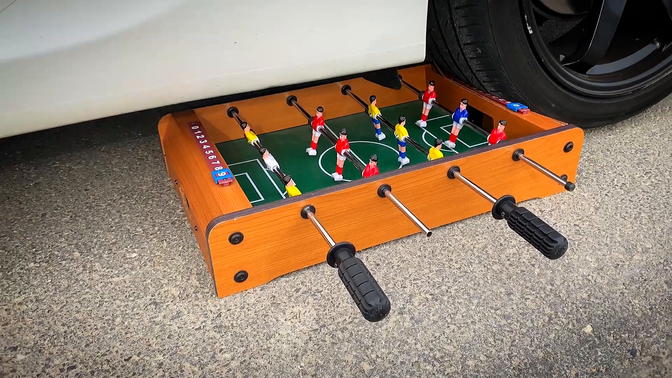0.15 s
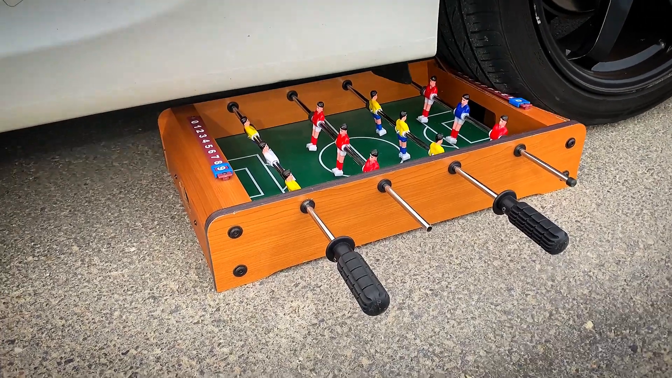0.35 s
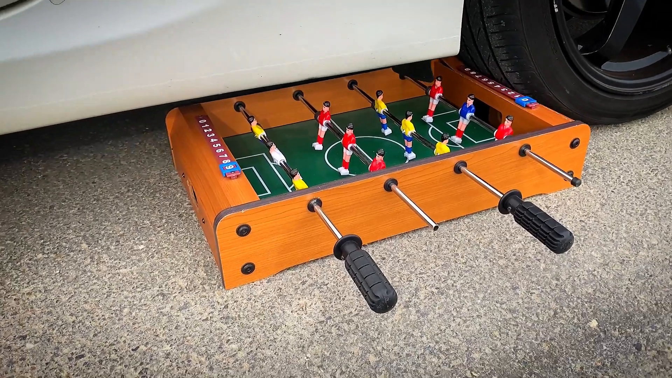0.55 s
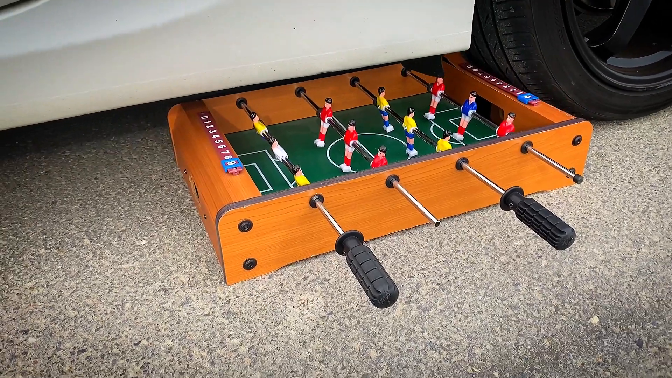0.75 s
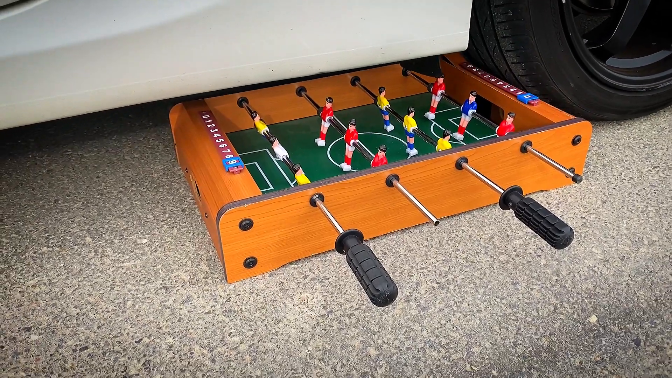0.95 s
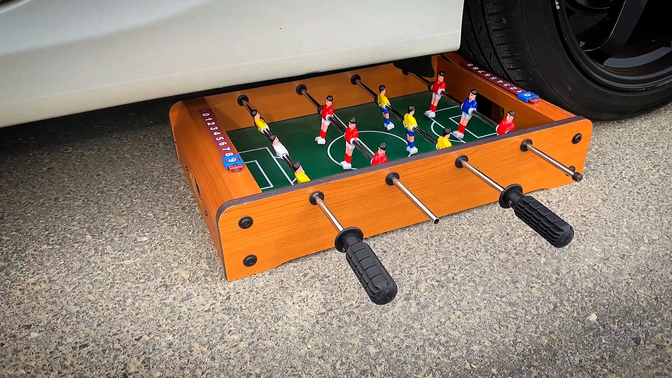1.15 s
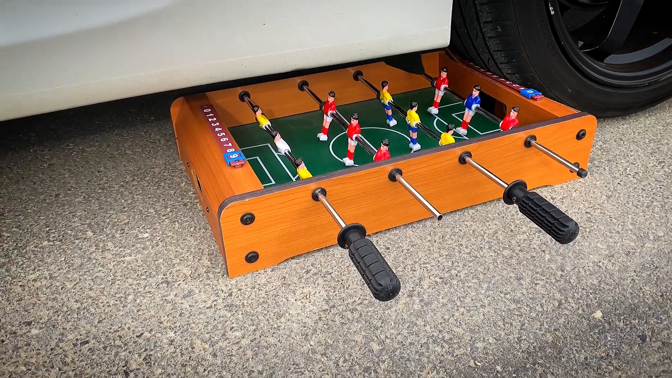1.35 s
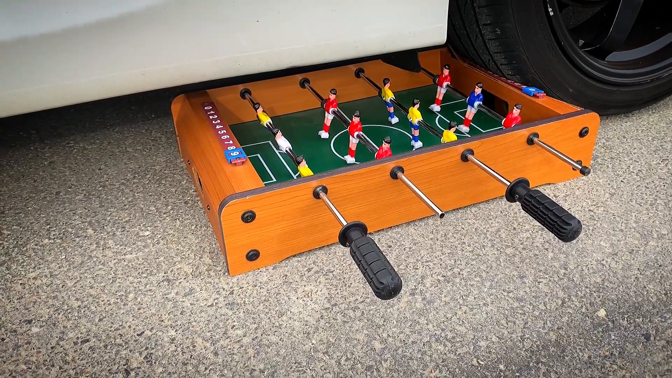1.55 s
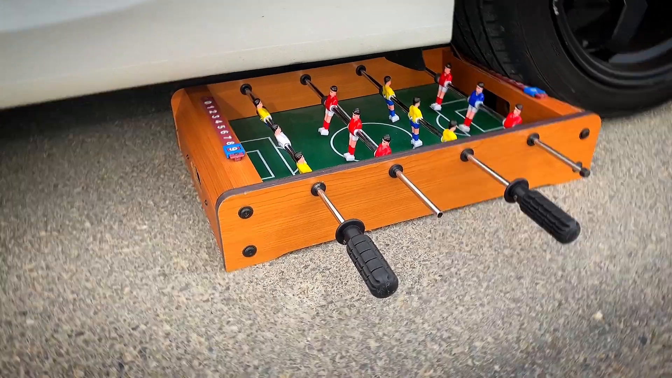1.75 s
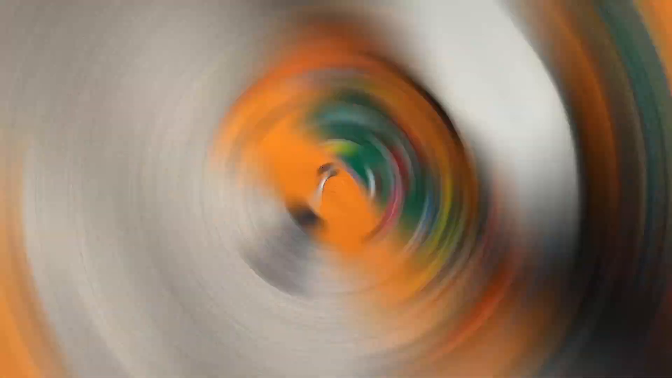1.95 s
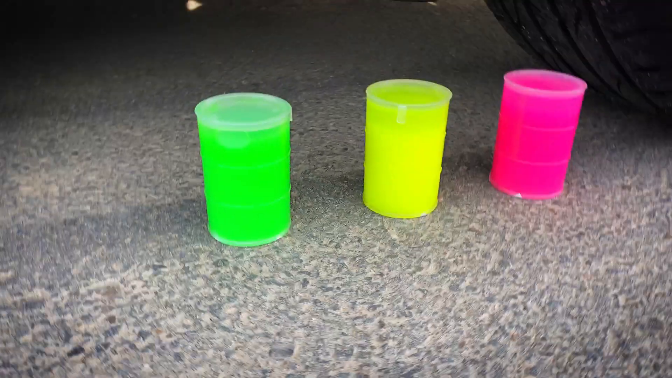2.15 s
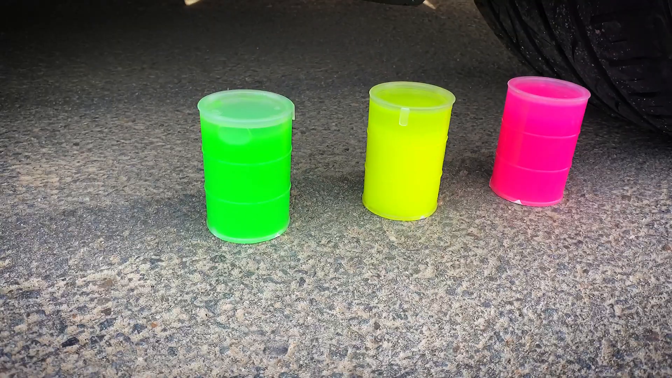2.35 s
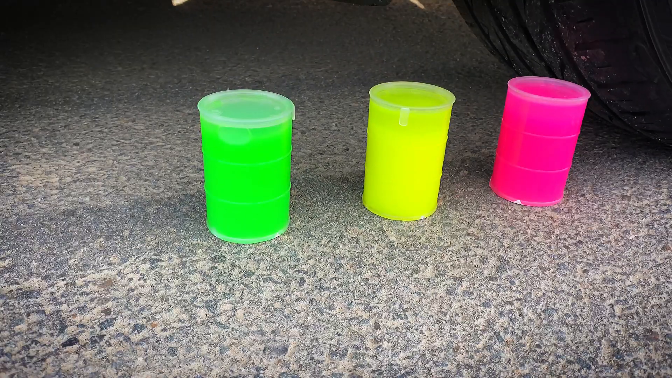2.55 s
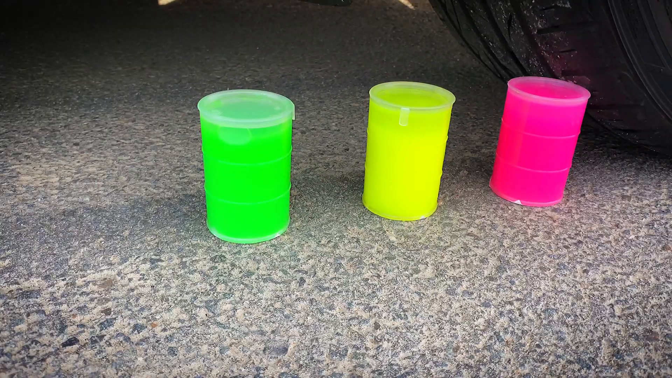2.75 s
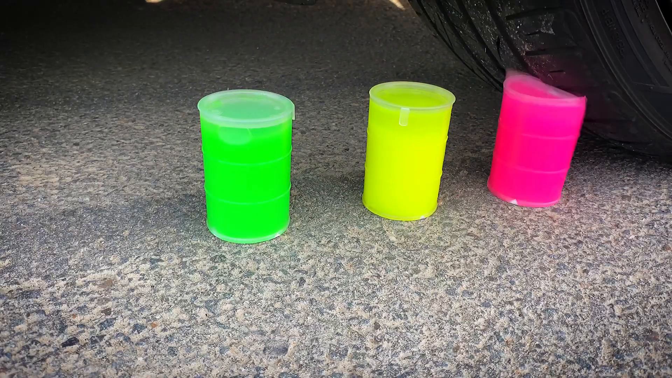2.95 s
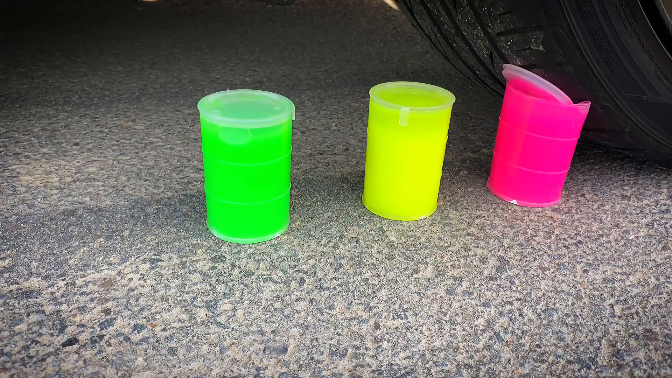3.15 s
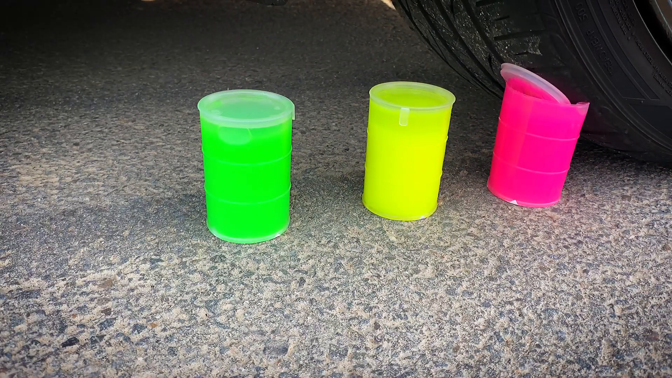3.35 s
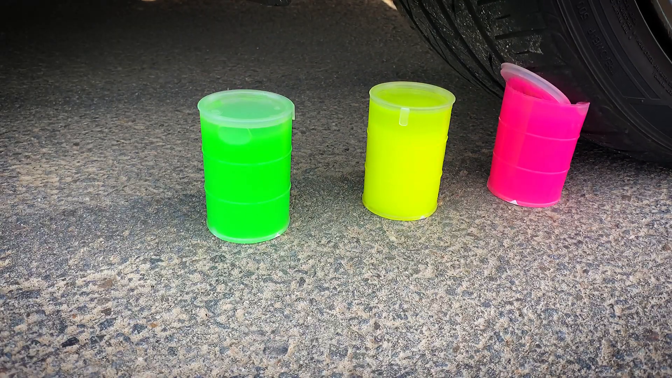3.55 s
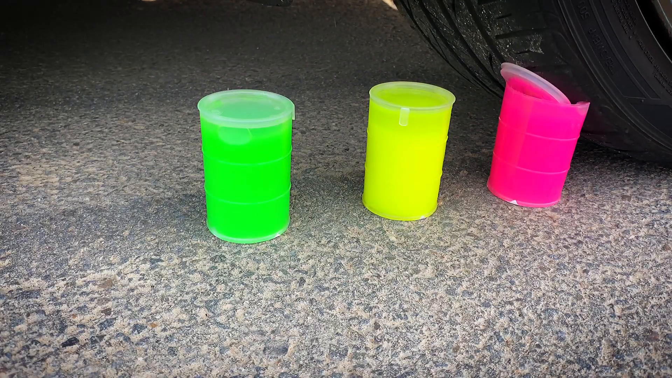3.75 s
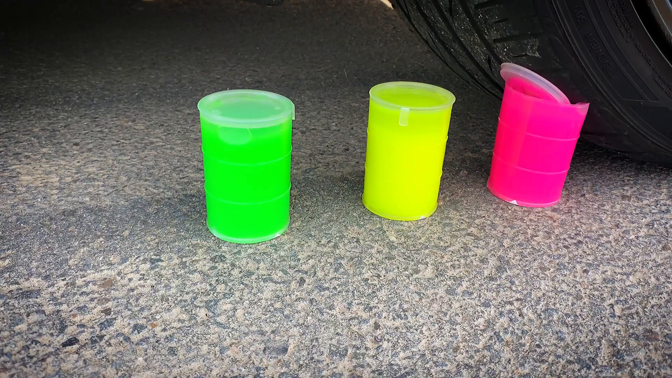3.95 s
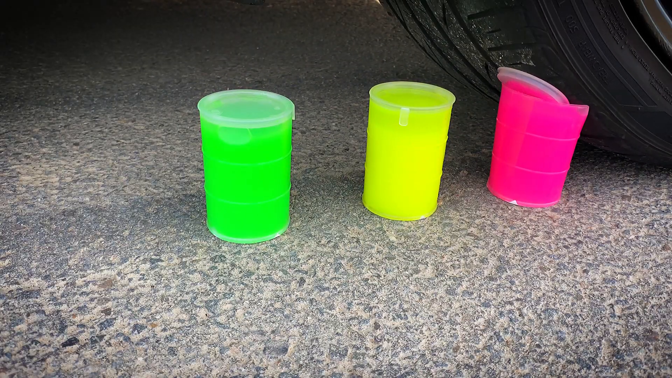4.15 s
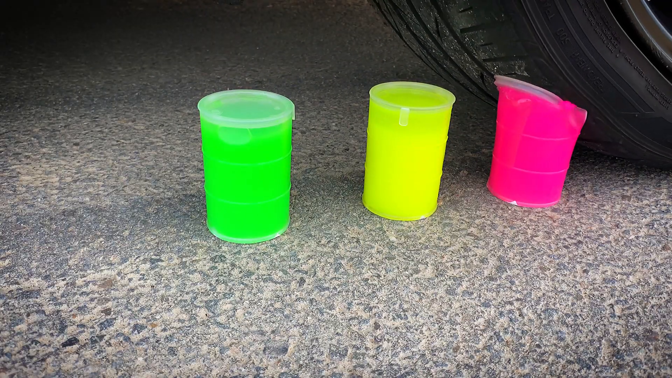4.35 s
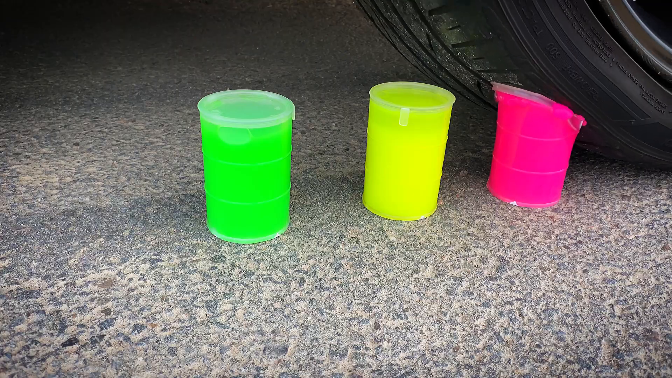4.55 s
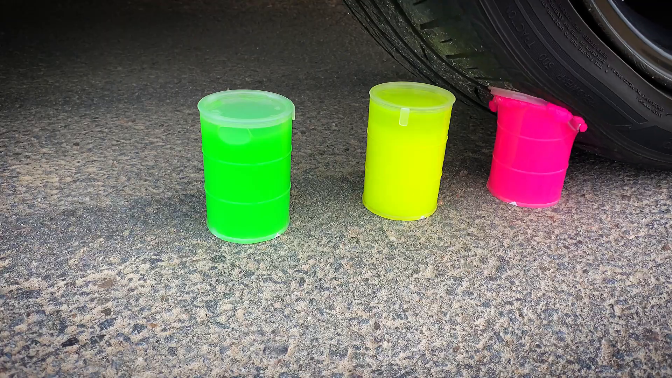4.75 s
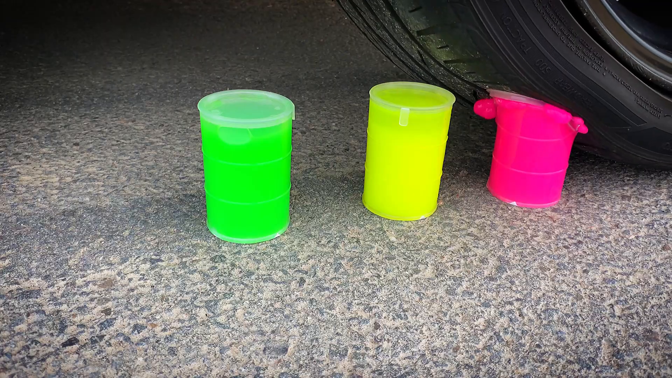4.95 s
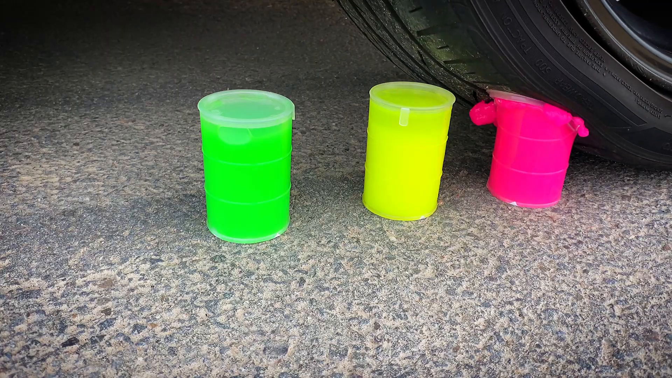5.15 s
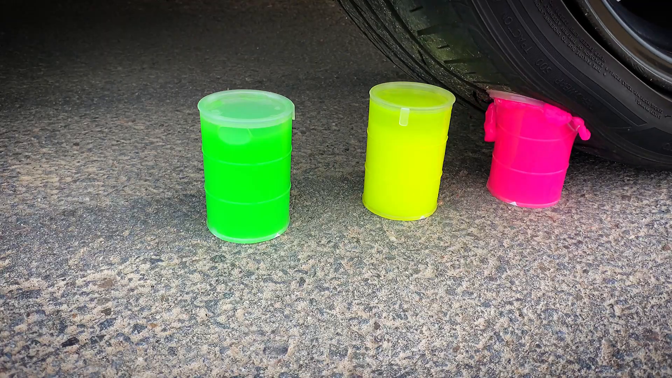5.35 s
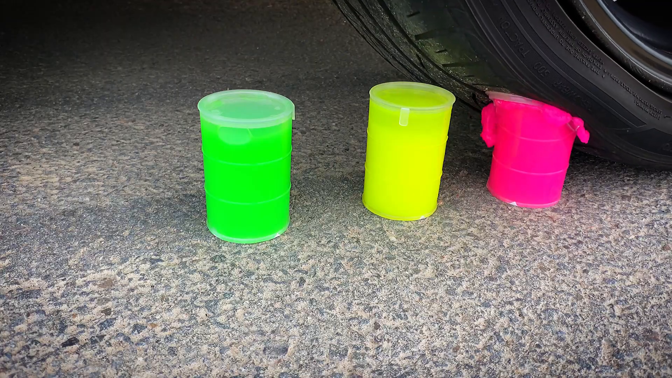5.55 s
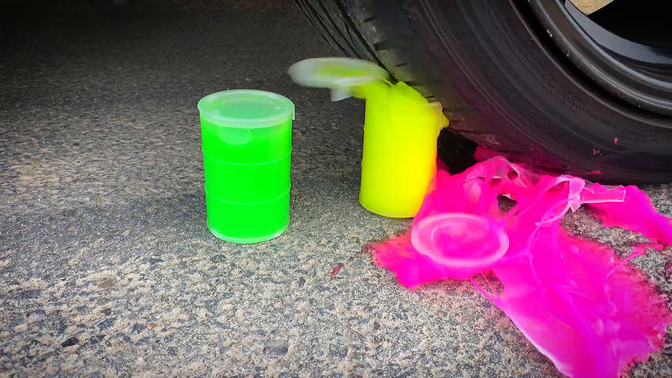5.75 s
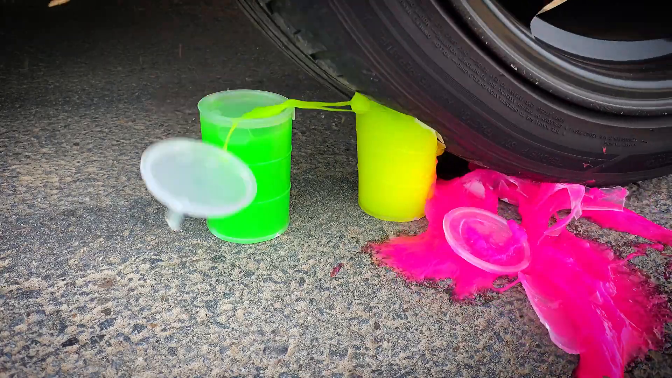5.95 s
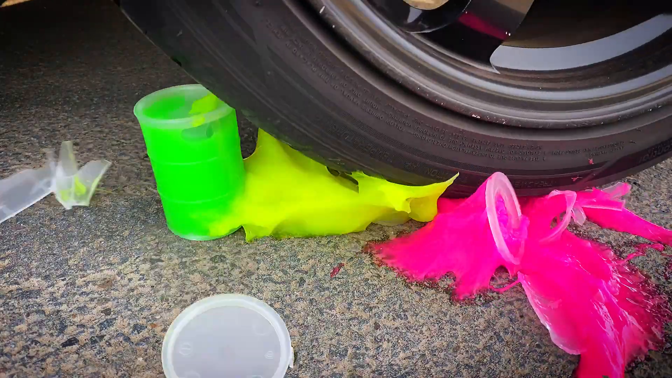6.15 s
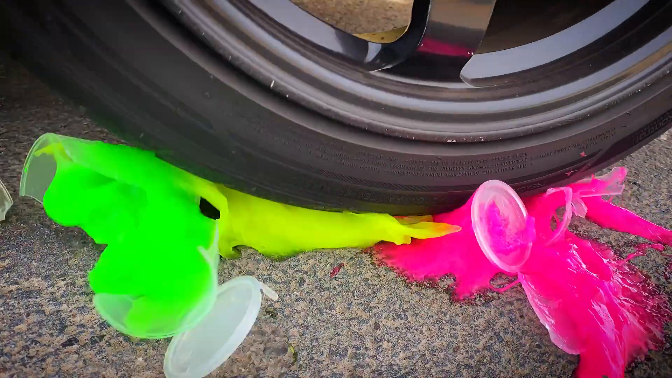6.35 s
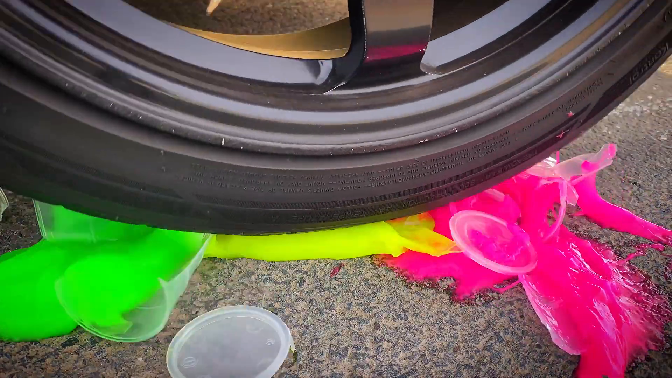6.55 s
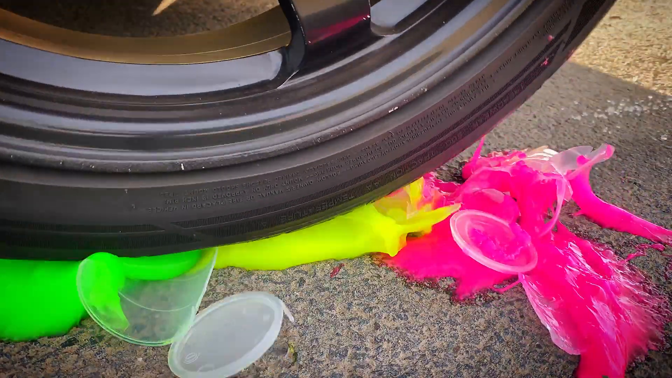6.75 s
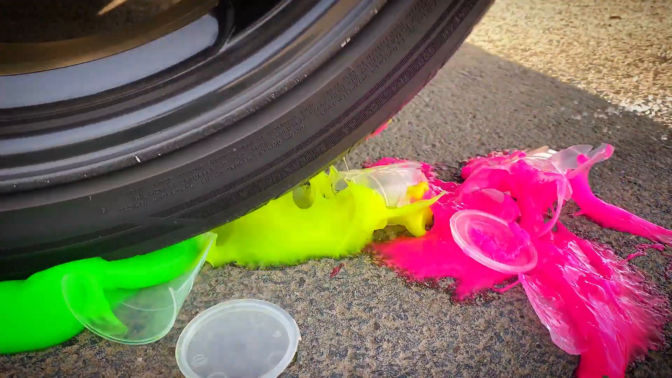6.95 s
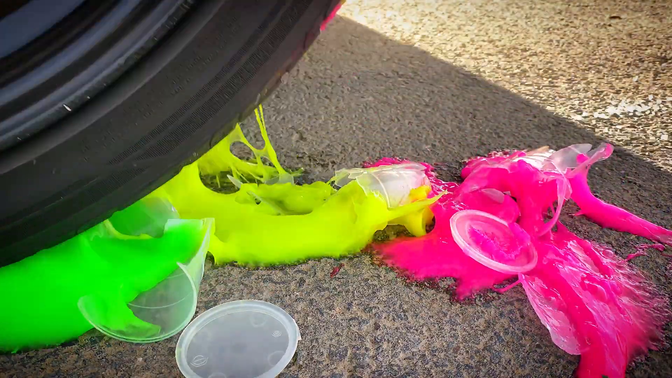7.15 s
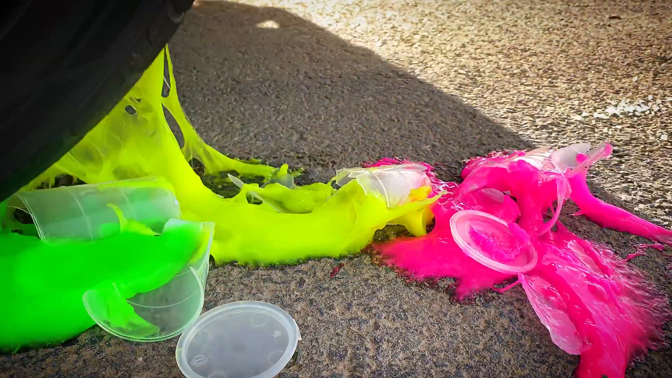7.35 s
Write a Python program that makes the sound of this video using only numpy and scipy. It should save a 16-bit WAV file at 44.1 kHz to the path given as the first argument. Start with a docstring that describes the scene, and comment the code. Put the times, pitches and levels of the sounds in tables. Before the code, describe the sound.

A car idles as a wooden toy cracks, then revs and rolls over plastic slime tubs that crack, burst and squelch.

```python
"""On asphalt, heard from close by, a car idles against a wooden table-football set that cracks.
After a short fade, the car revs and creeps over three plastic tubs of slime. The tubs crack, buckle
and crinkle, slime squelches out, and the tyre thumps as it drops. The engine's speed and load (how
hard it works) drive its hum and hiss. The loudest bursts overload the microphone."""
import sys
import numpy as np
from scipy import signal
from scipy.fft import rfft, irfft, next_fast_len
from scipy.io import wavfile
from scipy.ndimage import uniform_filter1d

SR = 44100
rng = np.random.default_rng(int(sys.argv[2]) if len(sys.argv) > 2 else 0)


def persist_wave(psi):
    """Save psi, clipped to +-1, as 16-bit WAV."""
    counts = np.round(np.clip(psi, -1, 1) * 32767).astype(np.int16)
    wavfile.write(sys.argv[1], SR, np.atleast_2d(counts).T)


N = 330309
TIME = np.arange(N) / SR
CHANGE_S = 1.995  # the wood scene ends and the tub scene begins

# tone colour of a plastic tub, heard under the car: pitch_hz, level_db
PLASTIC = [(150, -9.5), (260, -3.5), (450, 0), (600, -1.5), (800, -1.5), (1200, 3), (1600, -2.5),
           (3000, -1.5), (4500, -1.5), (6200, -9), (8600, -6.5), (10200, -16), (13000, -13.5), (16000, -18)]
# borders of four bands, from low to high (thud, knock, snap, fizz): edge_hz
BAND_EDGES_HZ = [220, 800, 2200, 6000, 16000]


def cracks():
    """Toys break sharply: first wood, which rings a little longer, then plastic."""
    # breaks: start_s, tear_s, level_db, brightness_db_per_octave, body_hz, shard_hz
    breaks = [(.0095, 0.0071, -4.5, -1.93, 530, 3300), (.266, 0.00093, -55.5, 2.5, 660, 7970),
              (.378, 0.0025, -30.5, 0, 876, 9300), (0.455, 0.0038, -41.5, -4.5, 1050, 2630),
              (1.389, 0.00082, -36.5, 5, 1800, 8700), (1.487, 0.0034, -19, -1, 500, 4400),
              (1.4943, 0.0024, -27.5, -4.5, 824, 2680), (2.866, 0.0012, -13.5, 0, 1090, 8500),
              (2.879, .004, -14.5, 1.5, 1170, 3400), (2.887, 0.0022, -20.5, 1.5, 1130, 8000),
              (2.932, 0.0027, -11, -3, 593, 2760), (4.226, 0.001, -41.5, 2.5, 410, 7750),
              (5.5619, 0.0014, -17.5, -1, 634, 3970), (5.59, 0.00069, -19.5, -1.5, 460, 8400),
              (5.61, 0.0013, -20, -1, 1140, 4681), (5.677, 0.0042, -0.4, 1.1, 383, 8700),
              (5.687, 0.0045, -6, -4, 419, 8492), (5.694, 0.00045, -17.5, 2, 700, 8000),
              (5.707, 0.0046, -2, -1.5, 630, 8750), (5.7187, 0.001, -11, -0.5, 880, 2700),
              (5.763, 0.0055, -13, 3, 710, 9100), (5.818, .0042, -16.5, 0.3, 1060, 3500),
              (5.864, 0.0018, -33, 1.7, 380, 8400), (5.966, 0.0085, -0.5, 0, 1040, 7340),
              (5.984, 0.0029, -12, -1.5, 447, 2712), (6.003, .0037, -26, -1, 636, 2330),
              (6.1, .001, -32, 1.7, 1790, 7720), (6.112, 0.0012, -38, 0.5, 2070, 8970),
              (6.165, .0094, -3.5, -2, 1160, 8500), (6.196, .0054, -9, 0.9, 675, 4240),
              (6.235, 0.0038, -13.5, -0.2, 880, 2920), (6.253, .0012, -31, 1, 2030, 5340),
              (6.262, 0.0023, -14, -0.5, 1110, 9000), (6.3065, 0.0021, -28, -0.5, 720, 3660),
              (6.579, 0.0013, -32.5, 0.2, 1900, 8300), (6.7036, .0014, -35.5, -1, 1380, 4940),
              (6.7567, 0.0042, -37, -0.5, 1010, 5370), (6.805, .0008, -37.5, 3, 1040, 4550),
              (6.841, .0029, -45, 2.5, 410, 6840), (6.883, 0.0011, -39, 0, 400, 4530),
              (7.277, .0011, -55, 1.2, 460, 8590), (7.337, .001, -58, 2.5, 430, 8950)]
    # tone colour of the wood: pitch_hz, level_db
    wood = [(150, -5.5), (300, -11.5), (450, -2.5), (600, -6), (820, -2), (1100, -2.5), (1900, -7.5),
            (3000, -2.5), (4500, -2.5), (6000, -13), (7900, -9), (9200, -16.5), (11000, -23), (16000, -27)]
    # balance of every break: thud_db, knock_db, snap_db, fizz_db
    balance_db = (-.8, 0.18, 0.93, -0.83)
    out = np.zeros(N)
    for start_s, tear_s, db, brightness, body_hz, shard_hz in breaks:
        material, tail_s = (wood, .14) if start_s < CHANGE_S else (PLASTIC, .12)
        band_db = db + brightness * octaves_above(2000) + balance_db
        sound = burst(fracture(tear_s), material, body_hz, shard_hz, band_db,
                      body_db=2.5, shard_db=3, tail_db=-18.5, tail_s=tail_s)
        add(out, start_s, sound)
    return out


def fracture(tear_s):
    """The force of a break: one sharp snap, a brief tearing and a shower of splinters."""
    t = np.arange(SR // 5) / SR
    tears = rng.standard_normal(len(t)) * undb(7.47 * rng.standard_normal(len(t)))
    tears *= np.exp(-(t / max(tear_s, .0003)) ** 2)
    splinters = clicks(len(t), chance=900 / SR) * tear_s / .0033  # long tears shed more
    force = tears + undb(4.5) * splinters * np.exp(-t / .014)
    force[0] += 6  # the snap
    return force


def burst(force, material, body_hz, shard_hz, band_db, body_db, shard_db, tail_db, tail_s):
    """A force rings the toy; the sound bounces between road and car, where low notes linger."""
    t = np.arange(len(force)) / SR
    body = undb(body_db) * ring(force, body_hz, q=6)
    shard = undb(shard_db) * ring(force, shard_hz, q=8)
    toy = colour(force + body + shard, material)
    out = 0
    for low_hz, high_hz, db in zip(BAND_EDGES_HZ, BAND_EDGES_HZ[1:], band_db):
        lowness = (1000 / np.sqrt(low_hz * high_hz)) ** .12
        near, far = rng.standard_normal((2, len(t)))
        echoes = undb(-9) * lowness * unit(near * undb(-60 * t / (.057 * lowness)))
        echoes += undb(tail_db) * unit(far * undb(-60 * t / (tail_s * lowness ** .5)))
        echoes /= np.sqrt(len(t))
        echoes[0] += 1  # the direct sound
        band = butter(signal.fftconvolve(toy, echoes)[:len(t)], [low_hz, high_hz], "band", order=3)
        out = out + undb(db) * unit(band)
    return out * np.sqrt(.01 * SR / len(t))  # levels count as if all the energy came in 10 ms


def buckles():
    """Tub walls fold with a hollow tock or creak; the slime damps all but their own pitch."""
    # folds: start_s, length_s, level_db, pitch_hz, fall_db_per_octave (either side of the pitch)
    folds = [(2.726, .0011, -38, 4040, 6), (4.151, .0027, -27, 428, 4), (4.205, .001, -37, 4300, 12),
             (4.571, .001, -37, 1820, 6), (5.838, 0.0026, -22.5, 1001, 5.5), (5.872, 0.001, -23, 890, 8),
             (6.045, .0008, -25.5, 3520, 4), (6.051, 0.0052, -16, 1200, 6.5), (6.186, .0024, -10, 1200, 9),
             (6.351, 0.0015, -19, 1900, 12), (6.383, .0011, -30, 2600, 9), (6.389, 0.0068, -8.5, 1650, 4),
             (6.421, 0.0021, -19, 1400, 13), (6.439, 0.00088, -23, 1110, 4), (6.448, .0017, -20, 1300, 9),
             (6.458, 0.00097, -11.5, 1490, 7), (6.496, .0024, -23, 1050, 9),
             (6.511, 0.0051, -8.5, 1870, 2.5), (6.5353, 0.0032, -13.5, 1210, 5),
             (6.5654, .001, -30, 1850, 11), (6.653, .0046, -27, 2310, 5), (6.992, 0.0024, -37, 1400, 4.5),
             (7.067, 0.0015, -15, 1350, 9), (7.211, 0.0029, -33.5, 1320, 6)]
    out = np.zeros(N)
    for start_s, length_s, db, hz, fall in folds:
        band_db = db - fall * np.abs(octaves_above(hz))
        sound = burst(fracture(length_s), PLASTIC, hz, shard_hz=3270, band_db=band_db,
                      body_db=0, shard_db=.5, tail_db=-17.5, tail_s=.12)
        add(out, start_s, sound)
    return out


def tub_ring():
    """The first tub is still whole, so it rings hollowly each time its lid cracks."""
    # cracks of the lid: start_s, level_db
    lid_cracks = [(2.866, -22), (2.879, -21), (2.932, -22)]
    # the tub's own notes: pitch_hz, level_db, ring_s (time to fall 60 dB)
    notes = [(655, -8, .33), (1090, -1, .07), (1240, 0, .1)]
    out, t = np.zeros(N), np.arange(SR // 3) / SR
    for start_s, crack_db in lid_cracks:
        sound = sum(np.sin(2 * np.pi * hz * t) * undb(crack_db + db - 60 * t / ring_s)
                    for hz, db, ring_s in notes)
        add(out, start_s, sound)
    return out


def crushing(attack_s=.016):
    """How hard the tyre flattens the plastic: each piece gives way quickly and settles slowly."""
    # flattened pieces: peak_s, level_db, settle_s
    pieces = [(5.79, -34, .11), (6.04, -27, 0.028), (6.21, -22, .033), (6.44, -38, 0.055),
              (6.67, -38, 0.19), (6.88, -52.5, 0.087), (7.12, -47, 0.048)]
    return sum(undb(db) * np.exp(-np.maximum((peak_s - TIME) / attack_s, (TIME - peak_s) / settle_s))
               for peak_s, db, settle_s in pieces)


def crumple(crush, creases_per_s=700):
    """Countless small creases snap in the flattened tubs."""
    creases = clicks(N, chance=creases_per_s / SR)
    creases *= undb(6.3 * np.minimum(rng.exponential(size=N), 4))  # a few are much louder
    t = np.arange(SR // 30) / SR
    echoes = .11 * rng.standard_normal(len(t)) * undb(-60 * t / .021)
    echoes[0] = 1
    sound = colour(butter(signal.fftconvolve(creases, echoes)[:N], 500, "high"), PLASTIC)
    return unit(sound + 1.2 * ring(sound, 1100, q=2.1)) * crush


def squelches():
    """Trapped air swells and sputters out through the slime under the tyre."""
    # spurts: start_s, length_s, level_db, brightness_db_per_octave, body_hz
    spurts = [(5.928, 0.011, -21, -1, 1500), (7.053, .013, -30.5, -5.5, 1140),
              (7.072, .016, -28.5, -4, 1140), (7.088, 0.019, -36, -6.5, 794), (7.105, .015, -22, -1, 1415),
              (7.142, 0.02, -20.5, -1.2, 870), (7.17, 0.0064, -44.5, -11, 660)]
    # balance of every spurt: thud_db, knock_db, snap_db, fizz_db
    balance_db = (-3, 5, -4, -1)
    out, t = np.zeros(N), np.arange(SR // 5) / SR
    for start_s, length_s, db, brightness, body_hz in spurts:
        swell = np.sin(np.pi * np.minimum(t / length_s, 1)) ** 2
        force = clicks(len(t), chance=.15) * swell
        band_db = db + brightness * octaves_above(2000) + balance_db
        sound = burst(force, PLASTIC, body_hz, shard_hz=2700, band_db=band_db,
                      body_db=7.5, shard_db=-1.5, tail_db=-14, tail_s=.16)
        add(out, start_s, sound)
    return out


def bubbles(crush, start_s, end_s, count, db):
    """Tiny air pockets pop in the squeezed slime; each rises in pitch as it opens."""
    out, t = np.zeros(N), np.arange(SR // 40) / SR
    for when, pitch, softness in rng.random((count, 3)):
        pop_s = start_s + when * (end_s - start_s)
        hz = 1000 * 2.6 ** pitch
        pop = np.sin(2 * np.pi * hz * t * (1 + 8 * t)) * np.exp(-hz * t / 3.6)
        add(out, pop_s, pop * np.interp(pop_s, TIME, crush) * undb(db - 14 * softness))
    return out


def spray(middle_s, length_s, db):
    """A thin jet of air and slime hisses out just before the second tub bursts."""
    gate = np.exp(-((TIME - middle_s) / (length_s / 2)) ** 6)
    hiss = noise([(1500, -20.5), (4000, -2.5), (8000, -1.5), (14000, -4), (16000, -4)])
    return hiss * gate * undb(db)


def tyre_drops(air_hz, ring_s, thump_db, pop_hz, pop_s):
    """A bursting toy pops hollowly; the drop thumps the rubber and rings the air inside the tyre."""
    # a toy gives way: start_s, tyre_db, pop_db
    drops = [(.012, -35, -8.5), (2.932, -29, -14), (5.677, -16.5, 14.5), (5.708, -31, 2.5),
             (5.968, -14, -2), (6.166, -26.5, -15), (6.51, -34, -24)]
    out, t = np.zeros(N), np.arange(SR) / SR
    for start_s, tyre_db, pop_db in drops:
        air_ring = np.sqrt(2) * np.sin(2 * np.pi * air_hz * t) * undb(-60 * t / ring_s)
        thump = band_noise(len(t), 110, 300) * undb(thump_db - 60 * t / .22)
        pop = band_noise(len(t), pop_hz * .8, pop_hz * 1.297) * undb(-60 * t / pop_s)
        add(out, start_s, undb(tyre_db) * (air_ring + thump) + undb(pop_db) * pop)
    return out


def engine(creep_hz=39.7):
    """The exhaust hums, uneven firings boom, gas puffs once a firing, and belts and fan hiss."""
    # engine speed on the way over the tubs: time_s, firings_hz
    speed = [(2.05, 35), (2.32, 38.3), (2.6, 39.98), (3.13, 41.2), (3.68, 41.9), (4.0, 56.3), (4.15, 60.5),
             (4.27, 58.26), (4.78, 38.36), (5.05, 32.6), (5.42, 37), (5.7, 39.4), (6.07, 42.11),
             (6.42, 39.15), (6.77, 32.25), (7.49, 23.98)]
    # engine load, a quick rev and then the climb over the tubs: time_s, above_creeping_db
    load = [(2.4, -0.5), (3.55, 0.6), (3.85, 11), (4.25, 3.5), (4.6, -0.5), (4.85, -1.5), (5.05, 6),
            (5.4, 7.5), (5.9, 7), (6.4, 1.6), (6.65, -2), (7.49, -5)]
    # tone colours of the boom and of the exhaust gas: pitch_hz, level_db
    boom_colour = [(45, -39.5), (75, 9), (110, 2), (165, 6), (195, -2), (240, -22.5), (300, -61)]
    gas_colour = [(150, -19.5), (220, 4), (290, -2.5), (350, 1.5), (430, 4), (530, -5.5), (640, -0.5),
                  (760, -13.5), (1100, -41.5)]
    hz, load_db = curves(speed)[0], curves(load)[0]
    firings, idle = np.cumsum(hz) / SR, TIME < CHANGE_S
    speed_octaves = np.log2(hz / creep_hz)
    speeding_up = uniform_filter1d(np.maximum(np.gradient(speed_octaves) * SR, 0), size=SR // 8)
    # steady at idle; on the move, each noise follows load and speed
    boom_db = np.where(idle, -48.5, -33 + 1.4 * load_db + 2.4 * speed_octaves)
    gas_db = np.where(idle, -50, -44 + .5 * load_db + 7.4 * speed_octaves) + 3.5 * speeding_up
    hiss_db = np.where(idle, -51.5, -45.5 + .03 * load_db + 9.23 * speed_octaves)
    hiss_db -= 3 * np.maximum(TIME - 6.3, 0)  # dies away once the engine has gone by
    pulse = np.cos(2 * np.pi * firings)
    hiss = undb(hiss_db) * belts_and_fan(idle) * (1 + .095 * pulse)
    boom = undb(boom_db) * noise(boom_colour)
    gas = undb(gas_db) * noise(gas_colour) * (1 + .27 * pulse)
    hum = np.where(idle, idle_hum(), driving_hum(hz, firings, load_db))
    return hum + boom + gas + hiss


def driving_hum(hz, firings, load_db):
    """Exhaust tones grow with load and swell as they pass a pitch at which the pipe rings."""
    # how strongly the pipe rings: pitch_hz, level_db
    pipe = [(25, -23), (33, -25.5), (42, -14), (60, -18), (70, -7), (80, 1), (100, -6.5), (125, -14.5),
            (140, -8), (165, -11.5), (200, -22.5), (240, -45)]
    # exhaust tones (unequal cylinders add the halves): times_firing_rate, level_db, waver (0-1)
    tones = [(1, 5.5, 0), (2, 0, 0), (3, -1, 0.06), (4, -1.45, 0.04), (4.5, -12, .2), (5, -4, 0.14),
             (5.5, -12, 0.1), (6, -7.5, 0.3)]
    pipe_hz, pipe_db = np.transpose(pipe)
    hum = 0
    for multiple, db, waver in tones:
        ring_db = np.interp(np.log(multiple * hz), np.log(pipe_hz), pipe_db)
        hum += undb(db + ring_db) * engine_tone(firings, multiple, waver)
    return hum * undb(load_db - 17)


def idle_hum():
    """A steady idle; the exhaust pipe rings most at four times the firing rate."""
    # the idling engine: time_s, firings_hz, level_db
    idling = [(0, 26.23, -22), (.45, 25.02, -24.5), (.7, 24.96, -27.5), (1.35, 25.77, -27.5),
              (1.98, 25.66, -22.5)]
    # its tones: times_firing_rate, level_db
    tones = [(1, -16.5), (2, -15), (3, -9), (3.5, -27), (4, 0), (5, -13.5), (5.5, -32.5), (6, -17),
             (6.5, -18), (7, -15.5), (7.5, -21.5), (8, -23)]
    hz, level_db = curves(idling)
    firings = np.cumsum(hz) / SR
    hum = sum(undb(db) * engine_tone(firings, multiple, waver=.11) for multiple, db in tones)
    return unit(hum) * undb(level_db)


def engine_tone(firings, multiple, waver):
    """One tone at a multiple of the firing rate; its strength wavers as the fuel burns."""
    wave = np.sqrt(2) * np.sin(2 * np.pi * (multiple * firings + rng.random()))
    return wave * (1 + waver * wander(14))


def belts_and_fan(idle):
    """Belts and fan make a fluttering hiss with a belt whine; thin whines join in at idle."""
    # tone colours of the hiss at idle and on the move: pitch_hz, level_db
    idle_colour = [(410, -31), (700, -6), (910, -6), (984, -8), (1140, -5), (1540, -6), (1750, -2),
                   (2730, -15), (3160, -12), (3640, -14.5), (6740, -19.5), (8760, -19), (9860, -25),
                   (13900, -32), (16000, -42)]
    drive_colour = [(410, -39.5), (700, -2.5), (997, -4), (1170, -2.5), (1500, -4), (1680, -2),
                    (1890, -5.5), (2370, -8.5), (2590, -11), (3550, -10), (5470, -16.5), (8650, -16.5),
                    (10700, -27), (14400, -27.5), (16000, -34.5)]
    # idle whines: pitch_hz, sharpness (q), above_hiss_db
    whine_notes = [(3220, 18, 4.5), (8990, 45, 7)]
    # how they swell: time_s, level_db
    whine_swell = [(.45, -12.5), (.65, 3), (1.3, -5.5), (1.98, -6.5)]
    idle_hiss = noise(idle_colour)
    swell = undb(curves(whine_swell)[0] + 3 * wander(14))
    whines = sum(undb(db) * ring(idle_hiss, hz, q) for hz, q, db in whine_notes)
    hiss = np.where(idle, idle_hiss + swell * whines, noise(drive_colour))
    belt = undb(1) * ring(hiss, hz=1701, q=84)
    return unit(hiss + belt) * undb(.36 * wander(25))


def moving_air(burst_s):
    """Air slowly buffets the microphone; later the first bursting tub's gust overloads it."""
    # strength of the buffeting: time_s, level_db
    strength = [(0, -24), (.85, -17), (1.2, -24.5), (1.98, -24)]
    buffet = band_noise(N, 4, 9) * undb(curves(strength)[0]) * (TIME < CHANGE_S)
    age_s = np.maximum(TIME - burst_s, 0)
    gust = 3.6 * (1 - np.exp(-age_s / .0005)) * np.exp(-age_s / .06)
    return buffet - gust


def fade(out_s, in_s):
    """The volume falls at the end of the wood scene and rises on the tub scene."""
    closing = np.clip((CHANGE_S - TIME) / out_s, 0, 1)
    opening = np.clip((TIME - CHANGE_S) / in_s, 0, 1) ** 1.03
    return closing + opening


def undb(db):
    """Turn decibels into a volume factor."""
    return 10 ** (np.asarray(db) / 20)


def unit(x):
    """Scale to an average strength (rms) of 1."""
    return x / np.sqrt(np.mean(x ** 2) + 1e-20)


def curves(table):
    """Join a table's timed points with lines, one curve for each column after the time."""
    time_s, *columns = np.transpose(table)
    return [np.interp(TIME, time_s, column) for column in columns]


def octaves_above(hz):
    """How many octaves thud, knock, snap and fizz lie above a pitch."""
    centres_hz = np.sqrt(np.multiply(BAND_EDGES_HZ[:-1], BAND_EDGES_HZ[1:]))
    return np.log2(centres_hz / hz)


def butter(x, hz, kind, order=2):
    """Keep the lows, the highs or one band of a sound."""
    return signal.sosfilt(signal.butter(order, hz, kind, fs=SR, output="sos"), x)


def colour(x, points):
    """Shape a sound by (pitch_hz, level_db) points, as a real object would."""
    hz, db = np.transpose(points)
    size = next_fast_len(len(x) // 2 + 2048) * 2
    grid_hz = np.maximum(np.arange(size // 2 + 1) * SR / size, 1)
    gain = undb(np.interp(np.log(grid_hz), np.log(hz), db))
    cepstrum = irfft(np.log(gain))
    # fold it so that ringing comes after a hit, never before
    cepstrum[1:size // 2] *= 2
    cepstrum[size // 2 + 1:] = 0
    return irfft(rfft(x, size) * np.exp(rfft(cepstrum)))[:len(x)]


def ring(x, hz, q):
    """Ring at one pitch; a higher q rings longer."""
    return signal.lfilter(*signal.iirpeak(min(hz, .45 * SR), q, fs=SR), x)


def noise(points):
    """Noise of strength 1 with a given tone colour."""
    return unit(colour(rng.standard_normal(N), points))


def band_noise(samples, low_hz, high_hz):
    """Noise of strength 1 between two pitches."""
    return unit(butter(rng.standard_normal(samples), [low_hz, high_hz], "band"))


def clicks(samples, chance):
    """Random clicks; each sample has the same chance of holding one."""
    return rng.standard_normal(samples) * (rng.random(samples) < chance)


def wander(rate_hz):
    """A slow random drift of strength 1."""
    hold = int(SR / rate_hz)
    steps = np.repeat(rng.standard_normal(N // hold + 1), hold)
    return unit(uniform_filter1d(steps, hold)[:N])


def add(out, start_s, sound):
    """Mix a sound in at its start time."""
    i = max(int(start_s * SR), 0)
    out[i:i + len(sound)] += sound[:N - i]


def scene():
    """Breaking toys, slime, tyre, engine and moving air in one channel."""
    crush = crushing()
    toys = cracks() + tub_ring() + buckles() + crumple(crush)
    slime = squelches() + bubbles(crush, start_s=6.5, end_s=7.25, count=100, db=12)
    slime += spray(middle_s=5.927, length_s=.03, db=-23.5)
    tyre = tyre_drops(air_hz=220.8, ring_s=.58, thump_db=10, pop_hz=364, pop_s=.075)
    mix = toys + slime + tyre + engine() + moving_air(burst_s=5.675)
    return (mix * fade(out_s=.46, in_s=.42))[None]


def record(dry):
    """The microphone chops off loud peaks, sheds steady pressure and loses the highest treble."""
    clipped = butter(np.clip(dry, -.97, .97), 1.3, "high", order=1)
    treble_cut = signal.ellip(10, .2, 75, 15900, fs=SR, output="sos")
    return signal.sosfilt(treble_cut, clipped)


dry = scene()
out = record(dry)
persist_wave(out)
```